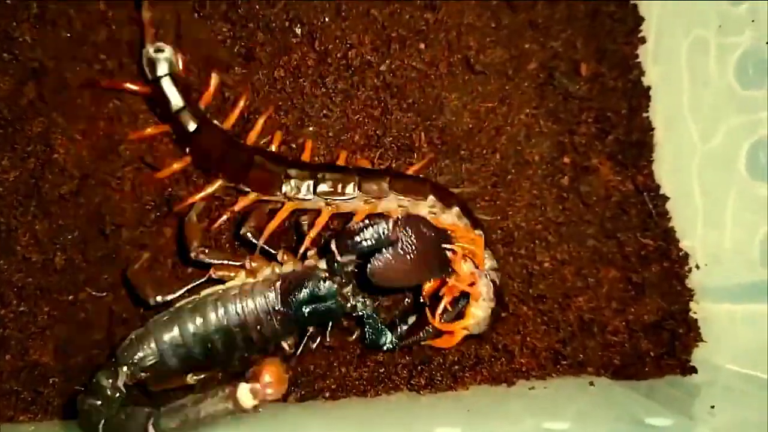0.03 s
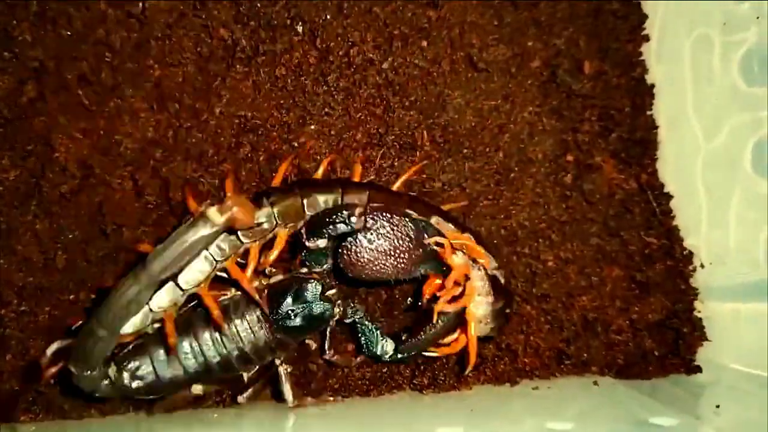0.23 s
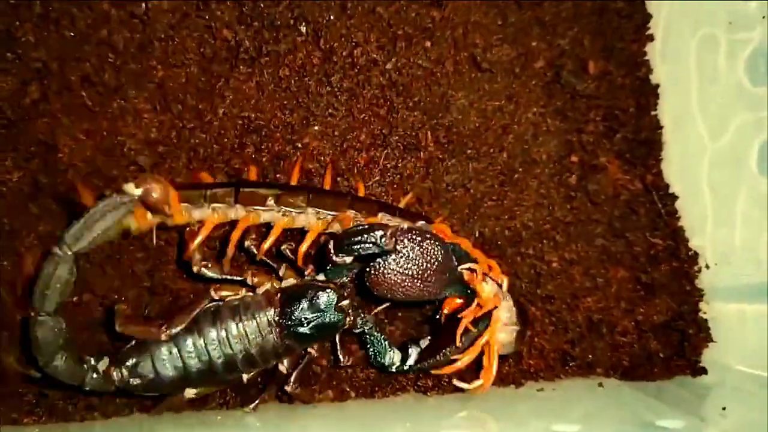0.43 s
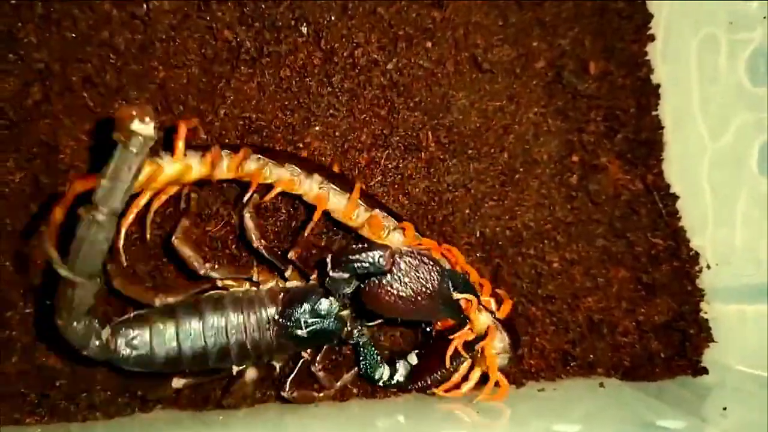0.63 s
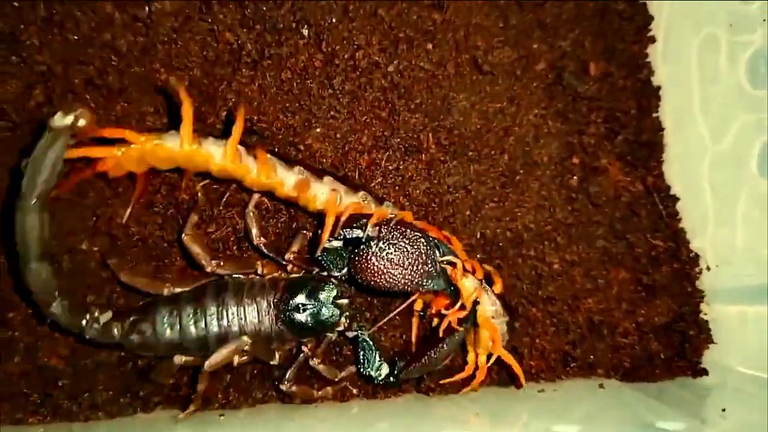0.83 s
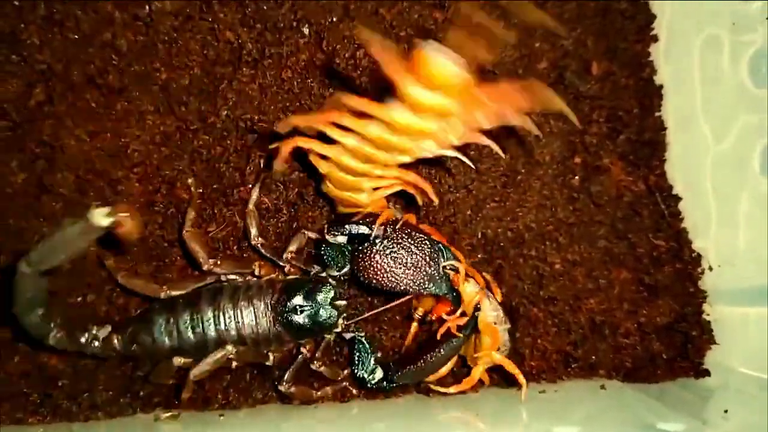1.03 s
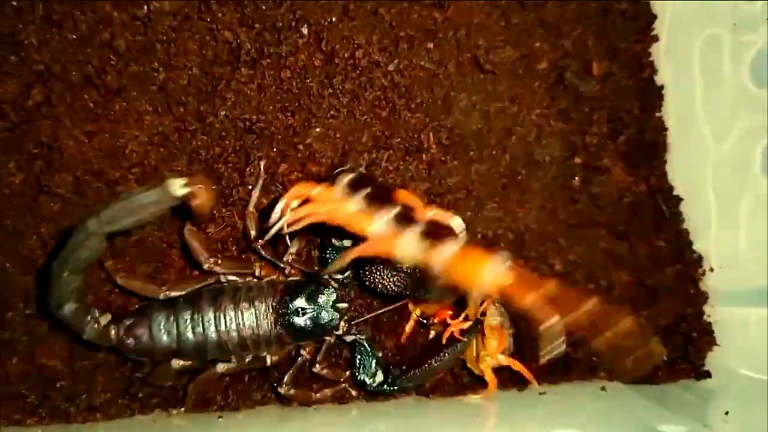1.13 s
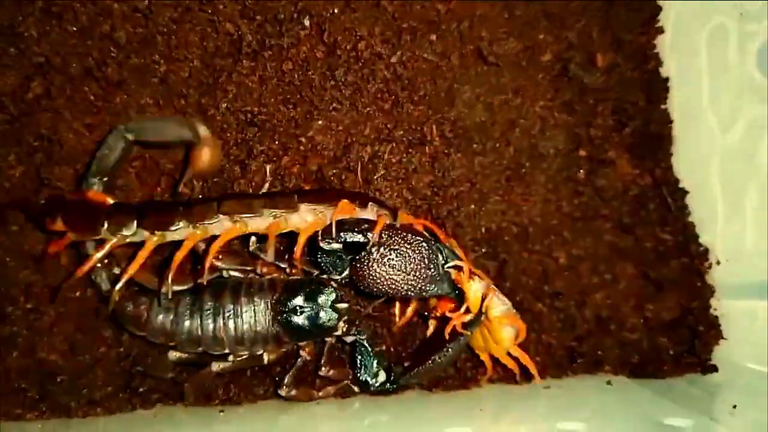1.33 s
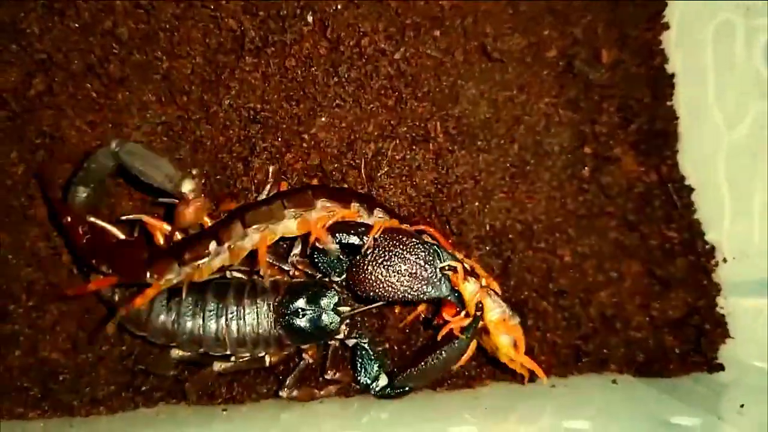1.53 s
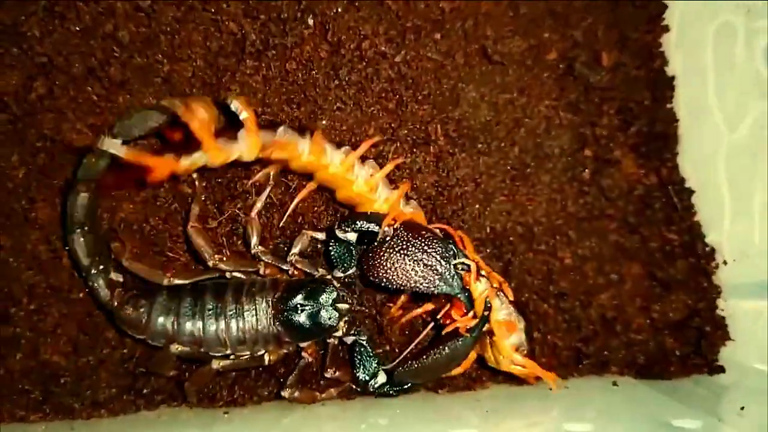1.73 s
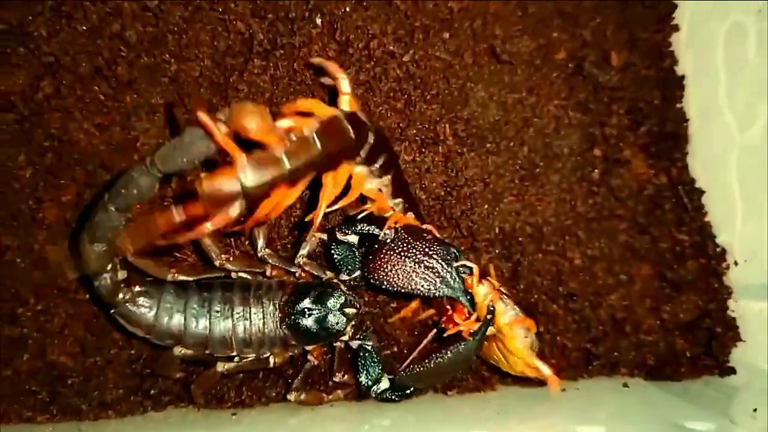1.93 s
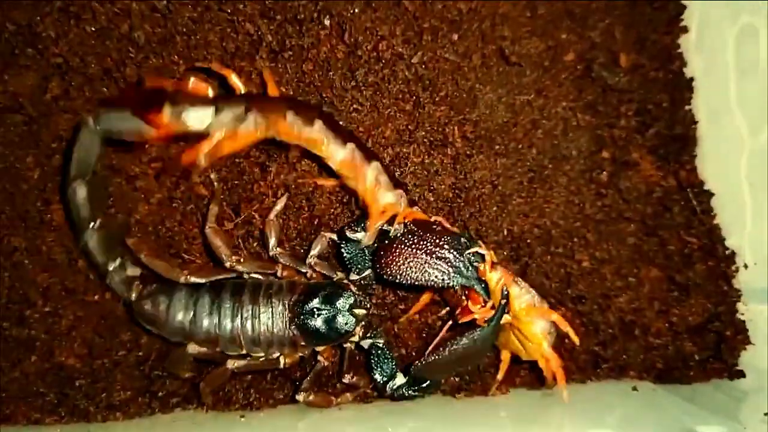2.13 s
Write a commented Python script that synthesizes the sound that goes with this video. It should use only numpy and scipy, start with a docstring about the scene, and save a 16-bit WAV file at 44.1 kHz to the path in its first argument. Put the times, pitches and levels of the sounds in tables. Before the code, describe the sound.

A sharp knock on a plastic tub lands at about 0.2 seconds, leaving a hollow boom that fades over a second or so. Before it come a lingering ring and a few shell clicks. Legs scratch softly through soil in short bouts from 0.5 seconds, with scattered ticks. Sharper claw snaps cluster from 1.5 to 1.9 seconds, with a soft knock near 1.8. Faint hiss and rumble lie underneath.

```python
"""A scorpion and a centipede wrestle on loose soil in a plastic tub.
Their legs rake the grains in short, crackling bouts while claws and shells tick and snap.
Their bodies knock on the tub: the wall gives a short, damped note, then booms with a long
hollow tail. Faint hiss and a low rumble sit underneath."""
import sys
import numpy as np
from scipy import signal
from scipy.fft import rfft, irfft
from scipy.io import wavfile

SR = 44100
rng = np.random.default_rng(int(sys.argv[2]) if len(sys.argv) > 2 else 0)


def log_audio(samples):
    """Write samples as a 16-bit WAV file to the path given in sys.argv[1]."""
    # one column per channel
    frames = np.atleast_2d(samples).T
    # limit to full scale, then quantise
    limited = np.clip(frames, -1, 1)
    pcm = np.round(limited * 32767).astype(np.int16)
    wavfile.write(sys.argv[1], SR, pcm)


N = 97020
T = np.arange(N) / SR

# Tone of the background hiss. Each row: frequency in Hz, relative level in dB.
HISS_COLOUR = [(25, 0), (120, 11), (230, 10), (330, 3.5), (480, -4.5), (700, -5.5), (1500, -7), (4300, -14),
               (6300, -20.5), (9000, -22), (11500, -26), (15000, -16)]
# Tone of the low rumble. Each row: frequency in Hz, relative level in dB.
RUMBLE_COLOUR = [(15, -30), (35, -18), (56, 2.5), (80, 0), (115, -0.5), (165, -10), (225, -6.5),
                 (300, -24.5), (1000, -96)]
# The rumble's slow swells. Each row: time in seconds, level in dB.
RUMBLE_FADER = [(0, -51), (.7, -54), (1.0, -48.5), (1.2, -52.5), (1.45, -46), (1.7, -49), (2.2, -55)]

# Booms left by heavy blows; the first is already ringing as the scene opens.
# Each row: start in seconds, gain in dB, low-pass in Hz, send to the wall's main note in dB.
BOOM_CUES = [(-0.56, -31, 2800, -14), (.218, -27, 5700, -18), (1.776, -51, 2400, 7.5)]
# Tone of the boom's diffuse wash. Each row: frequency in Hz, relative level per Hz in dB.
WASH_COLOUR = [(60, -49), (120, -5), (190, -1), (320, -5.5), (450, -0.5), (630, -5), (850, -3), (1400, -12),
               (2500, -18.5), (4300, -23), (6500, -33.5), (12000, -40)]
# How long that wash hangs on. Each row: frequency in Hz, time to fall 60 dB in seconds.
WASH_T60 = [(110, 0.33), (220, 2.38), (500, 2.204), (1000, 1.945), (2000, 1.59), (4500, 0.97), (10000, 0.8)]
# The tub's long, hollow modes. Each row: pitch in Hz, relative level in dB, 60 dB fall in seconds.
HOLLOW_MODES = [(122, 0, .7), (166, -9, 2.5), (229, -9, 3.0), (315, -12, 2.2), (427, -7, 2.3),
                (494, -12, 2.5), (707, -15, 2.2), (808, -11, 2.0), (1021, -16, 1.8), (1130, -18, 2.8),
                (1368, -18, 1.7), (1806, -21, 1.4), (1936, -20, 1.2)]

# How hard the legs rake the soil. Each row: time in seconds, level in dB.
RAKING_FADER = [(0, -53.5), (.09, -57.5), (.17, -58.5), (.44, -62), (.475, -49.5), (.54, -53), (.6, -61),
                (.64, -56), (.685, -65), (.72, -50.5), (.77, -53.5), (.84, -47), (.89, -62), (.97, -64.5),
                (1.03, -51), (1.09, -73.5), (1.42, -63), (1.48, -50), (1.57, -65), (1.62, -52),
                (1.7, -60.5), (1.8, -53), (1.86, -59), (1.96, -74), (2.0, -50), (2.03, -60), (2.07, -48.5),
                (2.12, -66), (2.2, -58.5)]
# Tone of the raked soil. Each row: frequency in Hz, relative level in dB.
SOIL_COLOUR = [(1500, -3), (2600, -8.5), (4200, -3.5), (5500, -15), (6800, -14), (9000, -4.5), (11500, -13),
               (13400, 0), (15200, 0)]

# Ticks of claw and shell. Each row: start in seconds, top band level in dB, high band level in dB,
# body note level in dB, body note pitch in Hz.
TICK_CUES = [(0.015, -48, -56, -62, 3080), (0.0269, -46, -53, -61, 4420), (0.0482, -25.5, -37.5, -42, 4400),
             (0.3944, -68, -64, -39, 2670), (0.458, -45, -60, -51, 3100), (0.4677, -31, -49, -41, 4520),
             (0.4833, -45, -52, -54, 4100), (0.6602, -53, -56.5, -76, 3000),
             (0.7062, -43.5, -54.5, -50, 4380), (0.737, -50, -56, -36.5, 3250),
             (0.812, -49, -67, -53, 2860), (0.8248, -43, -51, -53.5, 3360), (1.0328, -49, -50.5, -69, 3800),
             (1.1073, -59, -66, -66.5, 3300), (1.2129, -65, -77, -57, 4350), (1.2842, -60, -74, -75, 4000),
             (1.3287, -65, -58, -54.5, 3900), (1.395, -74, -69, -56.5, 2270),
             (1.4251, -66, -57, -60.5, 4430), (1.445, -64, -57, -53, 3570),
             (1.4618, -41.5, -50.5, -55, 5060), (1.4682, -52, -54, -53, 3469),
             (1.5936, -70, -78, -52.5, 3240), (1.602, -64, -75, -57, 3800), (1.623, -57, -62, -65, 4200),
             (1.646, -53, -56, -64, 2705), (1.6702, -36.5, -53, -57.5, 3560), (1.7116, -50, -59, -60, 4280),
             (1.7168, -39, -54.5, -53.5, 4130), (1.7514, -25.5, -47.5, -40.5, 4130),
             (1.8124, -45, -50, -44, 3550), (1.8342, -22.5, -43, -44, 3870),
             (1.8424, -48, -47, -48.5, 3580), (1.9928, -62, -64, -55.5, 4300),
             (2.0043, -65, -61, -48, 3220), (2.0617, -44.5, -57, -59, 2920), (2.1667, -75, -63, -54, 4050)]
# A shell's bright ring, top band then high band. Each row: centre in Hz, width in Hz, decay in seconds.
SHELL_BANDS = [(14290, 2350, 0.00042), (9140, 3040, 0.0016)]
# Tone of the wash behind the ticks. Each row: frequency in Hz, relative level in dB.
ECHO_COLOUR = [(1500, -11), (4000, -7.5), (6500, -14), (9500, -4), (12000, -5), (14500, 0.5)]

# Bodies hitting the tub. Each row: start in seconds, gain in dB, contact brightness (low-pass) in Hz.
KNOCK_CUES = [(0.2117, -11, 1110), (.2128, -3, 1020), (0.214, -15, 1360), (.2210, -11.5, 6750),
              (1.7726, -24.5, 1080)]
# The wall's short, damped modes. Each row: pitch in Hz, relative level in dB, 60 dB fall in seconds.
WALL_MODES = [(128.5, -15.5, 0.32), (191.6, -15, 0.12), (443.5, 1.5, 0.055), (826, -8, 0.032),
              (1066, -7.5, 0.018), (1356, -5, 0.033), (1935, -2.5, 0.016), (3213, -8.5, 0.017),
              (3530, -12, 0.013), (4410, -2, 0.0081), (5120, -11, 0.0093)]
# Coarse soil dragged along. Each row: time of the peak in seconds, peak level in dB.
DRAG_CUES = [(0.742, -55), (1.613, -71), (2.023, -62)]


def from_db(db):
    """Decibels to gain."""
    return 10 ** (np.asarray(db) / 20)


def rms_one(x):
    """Scale to rms 1."""
    return x / np.sqrt(np.mean(x ** 2) + 1e-20)


def at_hz(points, hz):
    """Read a table on a log-frequency axis."""
    freqs, values = np.transpose(points)
    return np.interp(np.log(np.maximum(hz, 1)), np.log(freqs), values)


def fader(curve):
    """Ride the gain through points of time and dB."""
    return from_db(np.interp(T, *np.transpose(curve)))


def swell(peak_s, sigma_s):
    """A bell-shaped fade in and out."""
    return np.exp(-.5 * ((T - peak_s) / sigma_s) ** 2)


def coloured(x, colour):
    """EQ a steady sound to a tone curve; rms 1."""
    gains = from_db(at_hz(colour, np.fft.rfftfreq(N, 1 / SR)))
    return rms_one(irfft(rfft(x) * gains, N))


def band(x, hz, width_hz, order=2):
    """Band-pass around a centre."""
    edges = np.clip([hz - width_hz / 2, hz + width_hz / 2], 10, .47 * SR)
    return signal.sosfilt(signal.butter(order, edges, "band", fs=SR, output="sos"), x)


def soften(x, hz):
    """Roll off the highs, as a soft contact does."""
    return signal.sosfilt(signal.butter(2, hz, fs=SR, output="sos"), x)


def add(out, start_s, x):
    """Mix x into out at a cue, trimming what falls outside the scene."""
    i = int(round(start_s * SR))
    x, i = x[max(-i, 0):], max(i, 0)
    out[i:i + len(x)] += x[:max(N - i, 0)]


def background(hiss_db=-57):
    """A bed of faint hiss and slowly swelling low rumble."""
    hiss = from_db(hiss_db) * coloured(rng.standard_normal(N), HISS_COLOUR)
    rumble = fader(RUMBLE_FADER) * coloured(rng.standard_normal(N), RUMBLE_COLOUR)
    return hiss + rumble


def tub_booms(modes_db=-3, cluster_width_hz=19.5, attack_s=0.002):
    """The tub rings on after a heavy blow: a hollow wash, longest in the low mids, and wavering modes."""
    out, t = np.zeros(N), np.arange(N + SR) / SR
    centres = 70 * 2 ** (np.arange(22) / 3)   # third octaves
    gains = from_db(at_hz(WASH_COLOUR, centres)) * np.sqrt(centres)
    gains /= np.linalg.norm(gains)
    white = rng.standard_normal((3, len(t) + SR))   # a second of pre-roll lets the filters settle
    wash = modes = 0
    for k, (hz, gain) in enumerate(zip(centres, gains)):
        noise_band = rms_one(band(white[k % 2], hz, hz * np.log(2) / np.e)[SR:])
        wash += gain * noise_band * from_db(-60 * t / at_hz(WASH_T60, hz))
    for hz, db, t60 in HOLLOW_MODES:
        cluster = rms_one(band(white[2], hz, cluster_width_hz)[SR:])
        modes += from_db(modes_db + db - 60 * t / t60) * cluster
    tail = (wash + modes) * (1 - np.exp(-t / attack_s))
    main_note = band(tail, hz=462, width_hz=75, order=1)
    for start_s, db, bright_hz, note_db in BOOM_CUES:
        add(out, start_s, from_db(db) * soften(tail + from_db(note_db) * main_note, bright_hz))
    return out


def grains(per_s=1100, spread_db=3, decay_s=0.00063):
    """Shifting soil: a dense run of tiny crackles of uneven size."""
    hits = rng.random(N) < per_s / SR
    sizes = hits * from_db(spread_db * np.minimum(rng.exponential(1, N), 4))
    power = signal.lfilter([1], [1, -np.exp(-2 / (decay_s * SR))], sizes ** 2)
    return rng.standard_normal(N) * np.sqrt(power)


def leg_raking():
    """Legs rake the loose grains in short, gritty bouts."""
    return fader(RAKING_FADER) * coloured(grains(), SOIL_COLOUR)


def snap(hz, width_hz, decay_s, attack_s=0.00018, crumble_db=-20.5, crumble_s=0.0045, skirt_db=-32):
    """One tiny fracture and its faint crumbling, ringing in a band."""
    t = T[:SR // 40]
    fall = np.exp(-t / decay_s) + from_db(crumble_db) * np.exp(-t / crumble_s)
    burst = rng.standard_normal(len(t)) * (1 - np.exp(-t / attack_s)) * fall
    ring = band(burst, hz, width_hz) + from_db(skirt_db) * band(burst, hz, width_hz, order=1)
    return ring * np.sqrt((SR // 250) / np.sum(ring ** 2))   # the energy of 4 ms at rms 1


def shell_ticks(body_decay_s=0.0015):
    """Claw meets shell in three layers: a bright snap, a lower body note and a dull tap."""
    out = np.zeros(N)
    for start_s, top_db, high_db, body_db, body_hz in TICK_CUES:
        bright = from_db(top_db) * snap(*SHELL_BANDS[0]) + from_db(high_db) * snap(*SHELL_BANDS[1])
        body = snap(body_hz, width_hz=1040, decay_s=body_decay_s)
        tap = snap(hz=1580, width_hz=1600, decay_s=body_decay_s)
        tap_db = -5.5 - .5 * max(top_db - body_db, 0)   # sharp contacts carry less tap than blunt ones
        add(out, start_s, bright + from_db(body_db) * (body + from_db(tap_db) * tap))
    return out


def with_echo(ticks, send_db=-14.5, t60_s=.28, attack_s=0.0078):
    """A short diffuse wash follows the energy of each tick."""
    envelope = from_db(-60 * T / t60_s) * (1 - np.exp(-T / attack_s)) ** 2
    power = np.abs(signal.fftconvolve(ticks ** 2, envelope ** 2 / np.sum(envelope ** 2))[:N])
    return ticks + from_db(send_db) * np.sqrt(power) * coloured(rng.standard_normal(N), ECHO_COLOUR)


def tub_knocks(crunch_db=-6, crunch_s=0.003, crack_db=-18, crack_s=0.00032, low_cut_hz=240):
    """Each blow rings the damped wall and crushes a little soil; harder contacts crack brighter."""
    out, t = np.zeros(N), T[:N // 4]
    wall = sum((-1) ** k * from_db(db - 60 * t / t60) * np.sin(2 * np.pi * hz * t)
               for k, (hz, db, t60) in enumerate(WALL_MODES))
    for start_s, db, bright_hz in KNOCK_CUES:
        grit = rms_one(soften(rng.standard_normal(len(t)), hz=3500))
        crunch = from_db(crunch_db) * grit * np.exp(-t / crunch_s)
        crack = from_db(crack_db) * rng.standard_normal(len(t)) * np.exp(-t / crack_s)
        hardness = (bright_hz / 6450) ** 2
        add(out, start_s, from_db(db) * (soften(wall + crunch, bright_hz) + hardness * crack))
    return signal.sosfilt(signal.butter(2, low_cut_hz, "high", fs=SR, output="sos"), out)


def soil_drags():
    """Coarser crumbs are dragged along in brief, raspy swells."""
    envelope = sum(from_db(db) * swell(peak_s, sigma_s=.02) for peak_s, db in DRAG_CUES)
    return envelope * rms_one(band(grains(), hz=3620, width_hz=1800))


def shell_slide(peak_db=-47):
    """Shell slides on shell, once, with a thin hiss."""
    hiss = rms_one(band(grains(), hz=14800, width_hz=2300))
    return from_db(peak_db) * swell(peak_s=1.654, sigma_s=.015) * hiss


def scene():
    """Tub, shells, soil and background, mixed in mono at one close microphone."""
    tub = tub_knocks() + tub_booms()
    shells = with_echo(shell_ticks()) + shell_slide()
    soil = leg_raking() + soil_drags()
    return (tub + shells + soil + background())[None]


def record(dry):
    """A steep high cut at 15.7 kHz takes the very top off the mix."""
    return signal.sosfilt(signal.ellip(10, .2, 70, 15700, fs=SR, output="sos"), dry)


dry = scene()
out = record(dry)
log_audio(out)
```